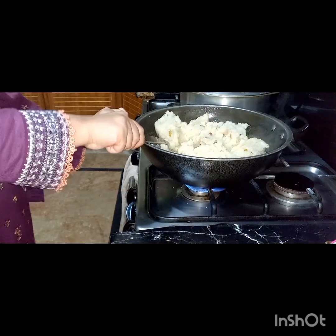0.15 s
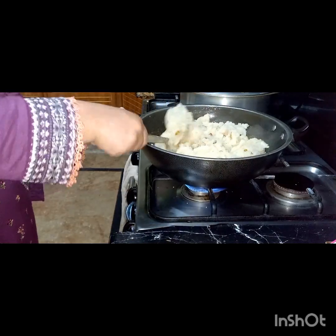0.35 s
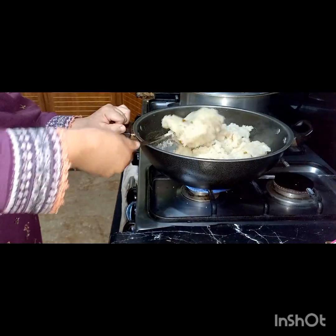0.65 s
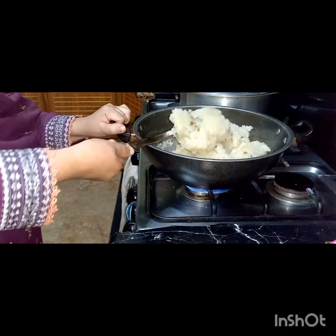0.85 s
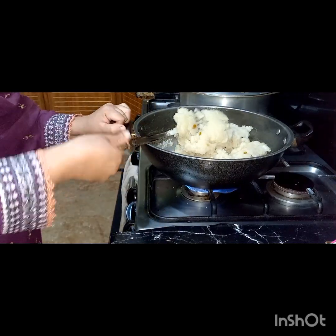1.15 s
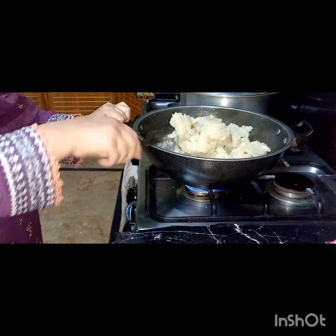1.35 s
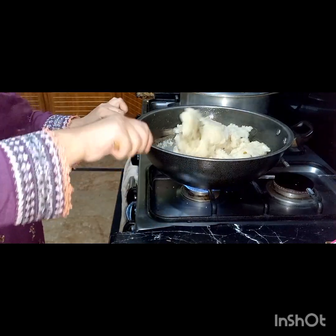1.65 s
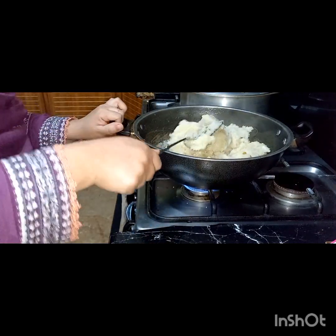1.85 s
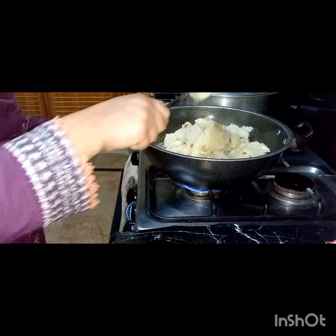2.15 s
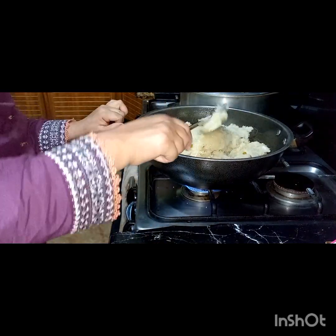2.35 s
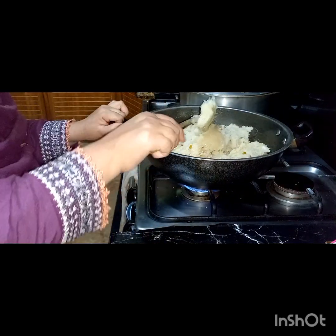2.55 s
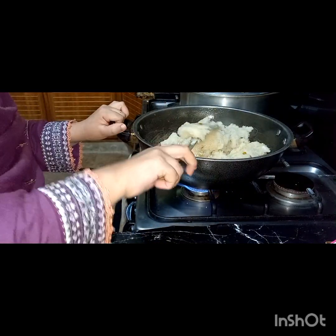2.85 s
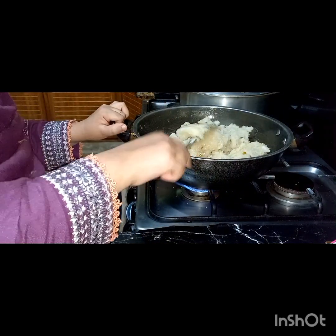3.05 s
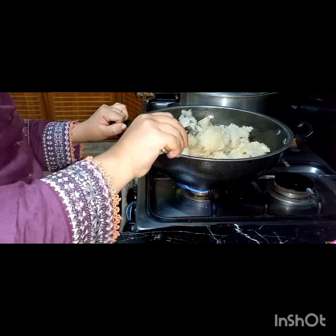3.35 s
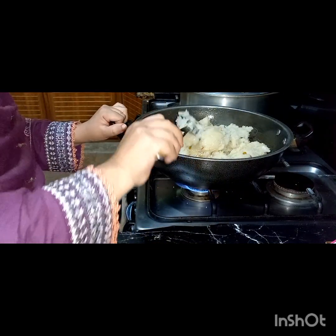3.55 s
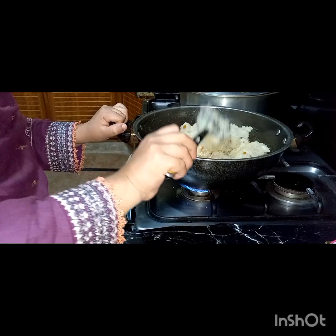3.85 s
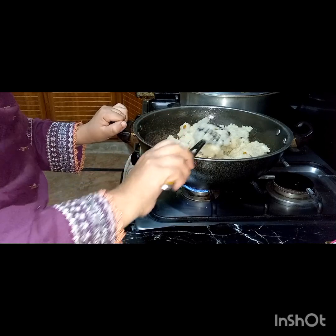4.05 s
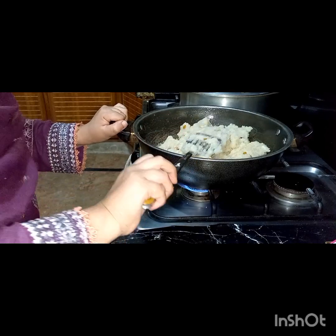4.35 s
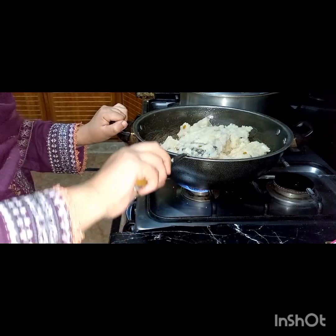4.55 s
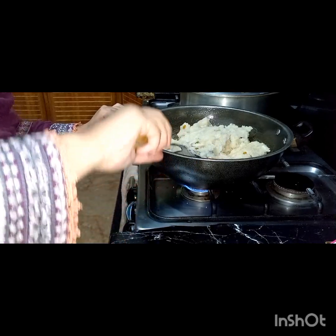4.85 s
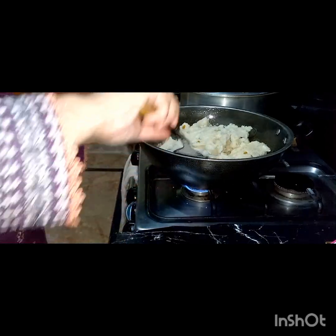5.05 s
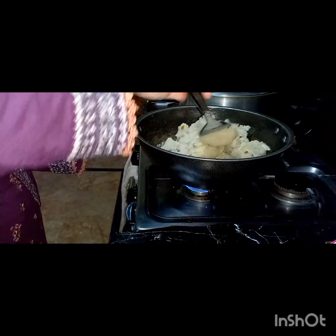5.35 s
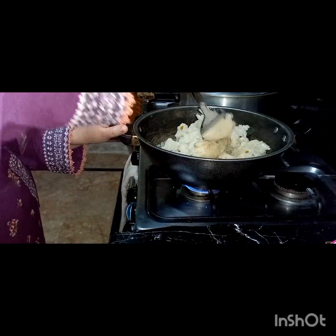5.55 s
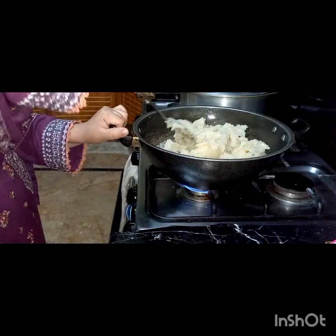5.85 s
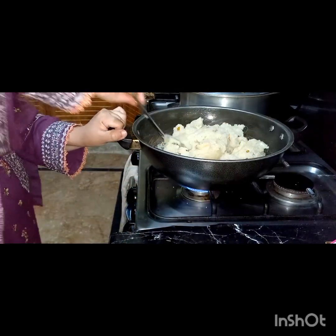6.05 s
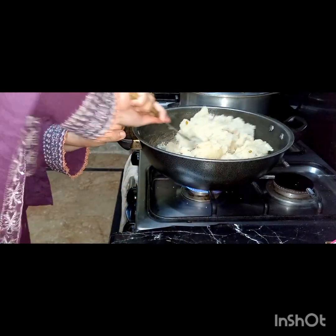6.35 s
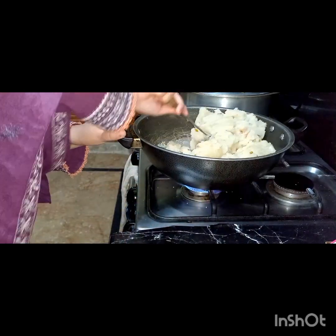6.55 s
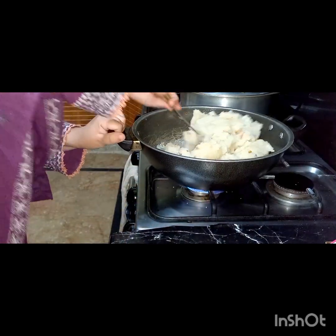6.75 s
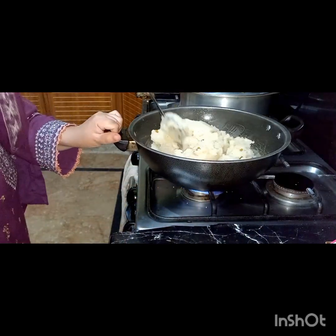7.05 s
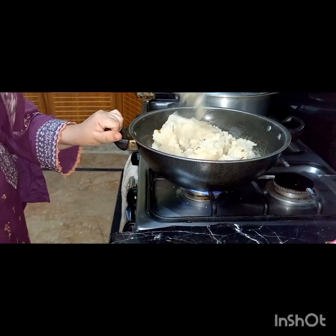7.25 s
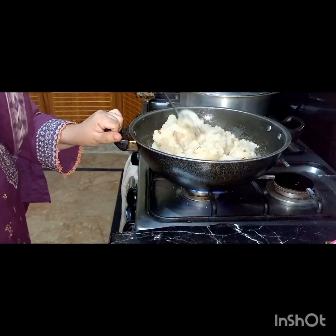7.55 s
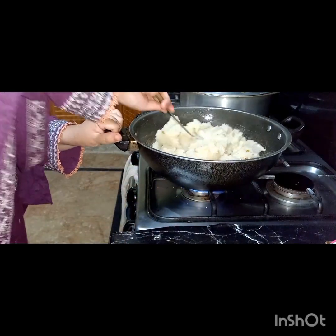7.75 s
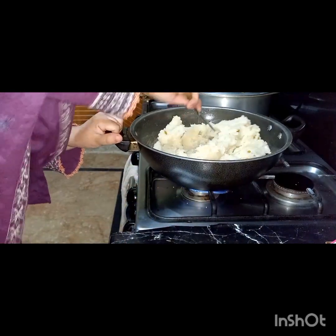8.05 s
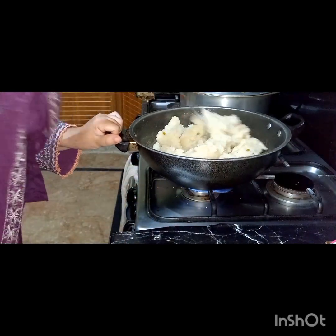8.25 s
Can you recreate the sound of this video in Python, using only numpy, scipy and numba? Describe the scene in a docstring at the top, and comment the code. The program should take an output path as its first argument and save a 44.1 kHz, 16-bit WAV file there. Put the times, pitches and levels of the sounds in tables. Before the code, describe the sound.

In a small hard-walled kitchen, a gas flame rumbles at first, then settles under light sizzling. A bright clink opens, and a paste-coated metal spoon drags softly around a wok, shoving thick paste, with occasional clinks. Later come a flurry of dull knocks and rasping scrapes, then one loud metallic bang and hard scrape near the end. Close, small microphone with lively room echo.

```python
"""A metal spoon turns thick halwa in a wok on a gas hob, in a small hard-walled kitchen.
At first the flame (shaped noise) rumbles loudly and soon settles; sizzle (tiny random clicks) calms with it.
From the start the coated spoon drags softly and shoves the paste (filtered slips); its edge clinks (modes).
Dull knocks on the wok (short pushes, ticks and modes) join in and gather into flurries.
Late on, the spoon scrapes hard in sticks and slips (a gliding rasp), and knocks the wok once loudly."""
import sys
import numpy as np
from scipy import signal
from scipy.fft import rfft, irfft
from scipy.io import wavfile
from scipy.ndimage import uniform_filter1d
from numba import njit

SR = 44100
rng = np.random.default_rng(int(sys.argv[2]) if len(sys.argv) > 2 else 0)


def wrap_up_sound(samples):
    """Save the sound to the file named by the first command line argument, as 16-bit audio."""
    columns = np.atleast_2d(samples).T
    # keep every value between -1 and 1, then stretch to whole-number steps
    tamed = np.clip(columns, -1, 1)
    steps = np.round(tamed * 32767).astype(np.int16)
    wavfile.write(sys.argv[1], SR, steps)


N = 370880
TIME = np.arange(N) / SR  # s, the whole scene
TAIL = np.arange(SR) / SR  # s, one second for impulse responses

# All spectra list: frequency_hz, density_db (power per Hz, relative).
# All mode tables list: mode_hz, t60_s, level_db (relative energy).

# Stereo width of diffuse sound: frequency_hz, side_minus_mid_db
STEREO_WIDTH = [(50, -20), (90, -16), (140, -12.5), (250, -5.5), (500, -9), (1000, 0), (2000, -0.5),
                (12000, 0.5)]

# Flame rumble as it burns loudly, then settles: time_s, rumble_db
FLAME_LEVELS = [(0.0, -43), (0.68, -53), (1.05, -61), (2.5, -63.5), (8.41, -64.5)]
# Spectrum of the flame's rumble
FLAME_SPECTRUM = [(30, -36), (48, -8), (62, -24), (82, -7), (98, 6), (118, -1.5), (145, -10.5),
                  (175, -29.5), (400, -39)]
# Spectrum of the rushing gas
GAS_SPECTRUM = [(25, -43), (48, 5), (62, -11), (100, -13), (170, -7.5), (240, 0), (310, -7), (450, -8.5),
                (550, 3.5), (720, -5), (1150, -3), (1550, -7.5), (1950, -7), (3000, -8), (4200, -22),
                (9000, -45.5)]

# Spectrum of the sizzling fat
SIZZLE_SPECTRUM = [(100, -26), (1200, -20), (2500, 0.5), (4600, 3.5), (6600, -2.5), (8300, 1.5),
                   (10000, -2.5), (12800, 0.5), (16000, -5)]
# Sizzle flares as steam escapes from lifted paste: peak_s, level_db, half_width_s (to 1/e of the power)
STEAM_PUFFS = [(0.785, -56, 0.016), (0.98, -62, 0.045), (1.325, -55.5, 0.016), (1.38, -59.5, 0.026),
               (1.736, -60, 0.1), (2.15, -60, 0.033), (2.306, -56.5, 0.0095)]
SIZZLE_FIRST_DB, SIZZLE_LAST_DB, SIZZLE_SETTLE_S = -59.5, -64.5, 3.9  # settling is a time constant

# Soft strokes of the coated spoon: start_s, length_s, rub_db, blade_db, spot_hz (pitch of the rubbed spot)
SOFT_STROKES = [(0.0, 0.8, -56.5, -62, 920), (0.6, 0.76, -56, -65, 720), (1.067, 0.032, -70, -57, 800),
                (1.31, 0.082, -55, -61.5, 760), (1.58, 0.56, -65.5, -66.5, 725),
                (2.298, 0.51, -70, -69, 560), (2.96, 0.48, -62, -61, 620), (3.443, 0.18, -62.5, -62.5, 700),
                (3.637, 0.34, -59.5, -56.5, 960), (4.236, 0.23, -58.5, -58.5, 780),
                (4.533, 0.56, -62, -61.5, 1010), (5.127, 0.056, -59.5, -54, 700),
                (5.288, 0.29, -63.5, -61.5, 580), (5.71, 0.44, -61, -61.5, 780)]
STROKE_ATTACK_S, STROKE_RELEASE_S = 0.044, 0.13  # linear rise, time constant of the fall
# Spectrum of the pan wall under rubbing
RUB_SPECTRUM = [(60, -38), (300, -3.5), (470, -6.5), (540, 7), (680, 1), (800, 6.5), (930, -4),
                (1150, -1.5), (1500, -17.5), (3000, -8.5), (6000, -22)]
# Spectrum of the spoon's resonance, damped by clinging paste
BLADE_SPECTRUM = [(100, -22), (1400, -15), (1750, -5), (1900, 5.5), (2050, -8), (2250, -3), (2600, -14.5),
                  (3100, -11.5), (4000, -19.5), (8000, -26)]

# Shoves of a lump of paste: start_s, length_s, paste_db, rumble_db (rumble of the hob)
PASTE_SHOVES = [(0.0, 0.05, -49, -71), (0.224, 0.25, -60.5, -58), (0.48, 0.19, -56.5, -53),
                (1.336, 0.044, -59, -54), (1.605, 0.22, -64.5, -81), (2.003, 0.13, -77, -66),
                (2.804, 0.045, -50, -60), (3.101, 0.21, -69, -70), (4.155, 0.066, -52, -58),
                (4.654, 0.31, -60.5, -64), (5.16, 0.24, -69, -71), (5.99, 0.13, -62, -64),
                (6.409, 0.091, -47.5, -51.5), (6.607, 0.058, -51, -49), (6.966, 0.24, -55.5, -58.5),
                (8.143, 0.12, -67, -60), (8.302, 0.11, -47, -50.5)]
SHOVE_ATTACK_S, SHOVE_RELEASE_S = 0.069, 0.066  # linear rise, time constant of the fall
# Spectrum of tearing paste, also of the pan's judder
PASTE_SPECTRUM = [(25, -52), (55, -22), (90, -8), (130, -16.5), (170, -13.5), (245, 2), (315, -7.5),
                  (390, -4.5), (600, -22), (1500, -41)]
# Spectrum of the hob's top booming under the wok
BOOM_SPECTRUM = [(40, -33.5), (70, -1.5), (100, 7.5), (135, -2.5), (180, -12), (260, -20), (500, -35)]

# Bright clinks of the spoon: start_s, tick_db, tick_t60_s, tick_low_edge_hz, ring_hz, ring_db,
# wok_hz, wok_db, room_db (echoes of the tick)
SPOON_CLINKS = [(0.002, -8, 0.16, 600, 5600, -14, 400, -15, 0.5),
                (2.8335, -4.5, 0.036, 500, 3320, -9.5, 566, -8, 0),
                (4.1577, -3, 0.026, 1200, 4930, -7.5, 750, -8.5, 1),
                (5.5630, -15, 0.019, 8500, 8700, -38, 600, -36, -9),
                (6.685, -26, 0.018, 5000, 5500, -37, 600, -38, -9)]
# Spectrum of the spoon's bare edge chattering on the rim
CHATTER_SPECTRUM = [(400, -12), (1200, -4.5), (2000, 1.5), (3600, -3), (5500, -1), (8200, 1), (11000, -2),
                    (13500, -7.5), (16000, -9)]
# Modes of the bare spoon bowl
SPOON_MODES = [(3117, 0.025, -5), (3240, 0.02, -1), (4720, 0.015, 5), (4830, 0.012, 4.5), (5000, 0.013, 2),
               (6000, 0.0045, -4), (7500, 0.005, -5), (8500, 0.007, -1)]
# Modes of the loaded wok
WOK_MODES = [(99.2, 0.78, -8), (210.6, 0.67, 3), (253, 1, -8), (268.2, 0.22, 4.5), (326, 0.5, -8),
             (384, 0.2, -3), (418, 0.29, -6.5), (447, 0.33, 2), (486, 0.33, -3), (541.3, 0.15, 11),
             (578.6, 0.18, -0.5), (623, 0.092, -0.5), (713, 0.093, 2), (799, 0.1, 4.5), (938, 0.074, -0.5),
             (1032, 0.058, -5.5), (1130, 0.072, 2.5), (1330, 0.12, 1.5), (1786, 0.091, -7),
             (1997, 0.064, 4.5)]

# Dull knocks on the wok: start_s, blow_hz, blow_db, tick_db, wok_db, room_db
WOK_KNOCKS = [(2.3598, 1100, -36, -27.5, -28.5, 1), (2.847, 238, -21, -45, -19, 0),
              (3.6828, 785, -42, -36, -33, 2), (6.1312, 617, -18, -26.5, -11.5, 5),
              (6.187, 1510, -17.5, -27, -17, 4), (6.213, 790, -13.5, -33, -24, -3),
              (6.2695, 780, -15, -35, -14, 3.5), (6.315, 645, -15, -24, -16, 4),
              (6.339, 560, -17, -23, -14, 2), (6.3594, 615, -19.5, -18.5, -15, 4.5),
              (6.455, 400, -19, -38, -19, -2), (6.6362, 1450, -20, -19.5, -21, 1),
              (6.6399, 890, -15, -21.5, -24, 0), (6.651, 267, -16.5, -45, -23, -1),
              (7.175, 400, -26, -45, -31, -1), (7.2165, 900, -31, -35, -25, -1),
              (7.2758, 1100, -21, -29, -34, -1), (7.385, 1100, -27, -34, -31, 6),
              (7.440, 1070, -29, -29, -16, 5), (7.587, 1080, -17, -27, -30, 3),
              (7.630, 1390, -25, -27, -34, 12), (7.7253, 815, 2.5, -0.5, 2, -3.5),
              (7.729, 760, 5.5, -4, -5.5, -4.5), (7.736, 460, -7, -30, -6, -8)]
# Spectrum of the tick in a knock
TICK_SPECTRUM = [(300, -79), (1200, 2), (2400, 3.5), (3600, -4), (4600, -1.5), (6600, -9), (8500, -5.5),
                 (10000, -13), (13000, -12), (16000, -20)]

# Hard scrapes; the rasp glides as the spoon travels over the curved wall: start_s, length_s, rasp_db,
# swell_db_per_s, first_hz, last_hz, judder_db, grit_db
HARD_SCRAPES = [(6.137, 0.24, -48, 35, 694, 600, -56, -68), (6.17, 0.16, -56, -2, 1400, 1000, -48.5, -74),
                (6.359, 0.17, -41.5, -67, 720, 446, -47.5, -50.5),
                (6.706, 0.13, -62, -23, 806, 704, -69, -65), (6.834, 0.13, -60, 1, 920, 925, -61, -68),
                (6.874, 0.025, -58, 0, 2900, 3200, -72, -58.5), (6.968, 0.15, -56, 8, 427, 585, -63, -84),
                (7.122, 0.577, -54, 11.5, 880, 1150, -72, -74),
                (7.733, 0.15, -34.5, -66, 490, 435, -42.5, -46),
                (7.854, 0.11, -46, -77, 467, 482, -41.5, -49),
                (7.948, 0.39, -57, 5.5, 1770, 1700, -65, -74), (8.332, 0.053, -54, 0, 900, 850, -58, -68)]
SCRAPE_ATTACK_S, SCRAPE_RELEASE_S = 0.028, 0.021  # linear rise, time constant of the fall
# The edge hiss sits 72 % of the way from rasp level to grit level, then EDGE_DB lower
EDGE_DB, EDGE_GRIT_SHARE = -8, 0.72
# Spectrum of the scraped pan wall
SCRAPE_SPECTRUM = [(40, -33), (200, -10), (380, -6), (470, 1.5), (570, 8.5), (850, 1.5), (1300, -1.5),
                   (1900, -1.5), (2600, -8.5), (4000, -23), (8000, -34)]
# Spectrum of the spoon's bare edge hissing on the pan
EDGE_SPECTRUM = [(200, -37), (1400, 2), (2000, -5), (3200, 1), (3800, -1), (5000, -12), (8000, -31)]
# Spectrum of crackling crust
GRIT_SPECTRUM = [(100, -56), (1200, 7.5), (3000, 0), (4500, 7), (6500, -1), (8300, 1), (9800, -4.5),
                 (13000, 0), (16000, -13)]

TOP_HZ = 15900  # top of the recorder's band


def amp(db):
    """Decibels to gain."""
    return 10 ** (np.asarray(db) / 20)


def fade(t60):
    """An exponential decay that drops 60 dB in t60 seconds, one second long."""
    return np.exp(-np.log(1000) * TAIL / t60)


def unit(x):
    """Scale a response to unit energy per channel."""
    return x / np.sqrt(np.mean(np.sum(x ** 2, axis=-1)))


def through(x, response):
    """Pass a sound through an impulse response."""
    return signal.oaconvolve(np.atleast_2d(x), np.atleast_2d(response), axes=-1)[:, :x.shape[-1]]


def colour(x, spectrum, size=4096):
    """Shape a sound with a causal minimum-phase filter of the given spectrum."""
    hz, db = np.transpose(spectrum)
    grid = np.maximum(np.fft.rfftfreq(size, 1 / SR), 1)
    curve_db = np.interp(np.log(grid), np.log(hz), db)
    cepstrum = irfft(np.log(amp(curve_db)))
    # folding the cepstrum forward makes the filter causal
    cepstrum[1:size // 2] *= 2
    cepstrum[size // 2 + 1:] = 0
    return through(x, irfft(np.exp(rfft(cepstrum))))


def level(x, band):
    """Scale a sound so that its middle has rms 1 within a band in Hz."""
    band_pass = signal.butter(2, band, "band", fs=SR, output="sos")
    middle = signal.sosfilt(band_pass, x.mean(axis=0))
    return x / middle.std()


def walk(rate):
    """Slow chance: random levels, rate per second, smoothed twice to spread 1."""
    k = int(SR / rate)
    steps = np.repeat(rng.standard_normal(N // k + 1), k)[:N]
    smooth = uniform_filter1d(uniform_filter1d(steps, k), k)
    return smooth / smooth.std()


def waver(rate, depth_db):
    """A gain that wanders at random."""
    return amp(depth_db * walk(rate))


def pan(right_db):
    """Lift the right and cut the left by the same decibels."""
    return amp([[-right_db], [right_db]])


def diffuse(size):
    """Noise from all around: alike in both ears in the bass, unrelated in the treble."""
    mid, side = rng.standard_normal((2, size))
    return mid + colour(side, STEREO_WIDTH) * np.array([[1], [-1]])


def slips(rate, spread_db, patchy_db):
    """Tiny random clicks, rate per second, of uneven size and with wandering loudness."""
    happens = rng.random(N) < rate / SR
    size = np.minimum(rng.exponential(size=N), 5)
    sign = rng.choice([-1, 1], N)
    return happens * sign * amp(spread_db * size + patchy_db * walk(35))


def scattered(clicks, wet_db, t60=0.11):
    """Clicks from ever-changing places: each trails its own diffuse echo, so no echo pattern repeats."""
    energy = np.abs(through(clicks ** 2, unit(fade(t60)) ** 2))
    return clicks + amp(wet_db) * np.sqrt(energy) * diffuse(N)


@njit
def sweep(x, hz, q):
    """State-variable band-pass whose centre moves."""
    y = np.empty_like(x)
    for c in range(len(x)):
        band, low = 0., 0.
        for i in range(len(hz)):
            g = np.tan(np.pi * hz[i] / SR)
            v = (band + g * (x[c, i] - low)) / (1 + g * (g + 1 / q))
            band, low, y[c, i] = 2 * v - band, low + 2 * g * v, v / q
    return y


def gesture(start, length, attack_s, release_s):
    """One move of the hand: the pressure builds, holds and dies away."""
    age = TIME - start
    rise = np.clip(age / attack_s, 0, 1)
    return rise * np.exp(-np.clip((age - length) / release_s, 0, 20))


def together(envelopes, dbs):
    """Gain of overlapping gestures, each at its own level; their powers add."""
    return np.sqrt(amp(dbs) ** 2 @ np.square(envelopes))


def ring(modes):
    """Impulse response of decaying modes that start from rest; neighbours swing opposite ways."""
    total = 0
    for k, (hz, t60, db) in enumerate(modes):
        mode = unit(fade(t60) * np.sin(2 * np.pi * hz * TAIL))
        total = total + (-1) ** k * amp(db) * mode
    return unit(total)


def wok_response():
    """The wok's wide wall sends each of its modes a little differently to each ear."""
    modes = ring(WOK_MODES)
    side = unit(through(modes, rng.standard_normal(SR) * fade(0.013)))
    return unit(modes + amp(-2.0) * side * np.array([[1], [-1]]))


def struck(wok, hz, q=1.0):
    """The wok's ring after a blow: the modes near the blow's own pitch answer most."""
    return unit(signal.lfilter(*signal.iirpeak(hz, q, fs=SR), wok))


def boom(t60=1.0, build_s=0.028):
    """A blow reaches the hob through the grate; its low boom comes late and stays."""
    swelling = fade(t60) * (1 - np.exp(-TAIL / build_s))
    return unit(colour(diffuse(SR) * swelling, BOOM_SPECTRUM))


def kitchen(low_t60=0.81, high_t60=0.41, early_t60=0.26, early_db=-4, build_s=0.0094):
    """Early echoes from hob and wall, and a tail in which the lows come late and stay."""
    low = signal.sosfilt(signal.butter(2, 700, fs=SR, output="sos"), diffuse(SR))
    high = signal.sosfilt(signal.butter(2, 700, "high", fs=SR, output="sos"), diffuse(SR))
    tail = low * fade(low_t60) * (1 - np.exp(-TAIL / build_s)) + high * fade(high_t60)
    early = unit(diffuse(SR) * fade(early_t60))
    after_gap = TAIL > .002  # s before the first echo
    return unit((unit(tail) + amp(early_db) * early) * after_gap)


def heard(x, room, wet_db):
    """Direct sound plus the kitchen's answer."""
    return x + amp(wet_db) * through(x, room)


def add(out, s, sound):
    """Mix a sound in at a time."""
    start = max(int(s * SR), 0)
    out[:, start:start + sound.shape[-1]] += sound[:, :N - start]


def hob(gas_db=-57.0):
    """The flame rumbles unevenly under the wok and the gas rushes steadily."""
    time_s, rumble_db = np.transpose(FLAME_LEVELS)
    flame_gain = amp(np.interp(TIME, time_s, rumble_db))
    flame = level(colour(diffuse(N), FLAME_SPECTRUM), (70, 140))
    gas = level(colour(diffuse(N), GAS_SPECTRUM), (200, 3000))
    flame = flame * flame_gain * waver(rate=7.2, depth_db=1.0) * pan(right_db=2.0)
    return flame + gas * amp(gas_db)


def sizzle():
    """Fat fizzes in countless tiny bursts, slowly calms, and flares where steam escapes."""
    calming = np.exp(-TIME / SIZZLE_SETTLE_S)
    steady = amp(SIZZLE_LAST_DB + (SIZZLE_FIRST_DB - SIZZLE_LAST_DB) * calming)
    flare_power = sum(amp(db) ** 2 * np.exp(-((TIME - s) / width) ** 2) for s, db, width in STEAM_PUFFS)
    bursts = slips(rate=9000, spread_db=2.5, patchy_db=.3)
    fizz = level(colour(scattered(bursts, wet_db=11.0), SIZZLE_SPECTRUM), (4000, 15000))
    return fizz * np.sqrt(steady ** 2 + flare_power) * pan(right_db=1.1)


def stirring(spot_db=-7):
    """The coated spoon rubs the pan, each spot with its own pitch, and hums in its own damped resonance."""
    _, _, rub_db, blade_db, spot_hz = np.transpose(SOFT_STROKES)
    strokes = [gesture(s, length, STROKE_ATTACK_S, STROKE_RELEASE_S) for s, length, *_ in SOFT_STROKES]
    # overlapping strokes share one pitch, weighted by their power
    power = np.square(strokes) + np.finfo(float).eps
    centre_hz = spot_hz @ power / power.sum(axis=0)
    catches = slips(rate=2500, spread_db=2.5, patchy_db=.9)
    # the hand's pressure wavers
    contact = scattered(catches, wet_db=2.0, t60=0.031) * waver(rate=5.4, depth_db=1.5)
    wall = colour(contact, RUB_SPECTRUM)
    spot = sweep(wall, centre_hz, q=2.8)
    rub = level(unit(wall) + amp(spot_db) * unit(spot), (480, 1300))
    blade = level(colour(contact, BLADE_SPECTRUM), (1700, 2400))
    return rub * together(strokes, rub_db) + blade * together(strokes, blade_db)


def shoving():
    """Thick paste tears and flops as it is shoved, and the push rumbles in the hob."""
    _, _, paste_db, rumble_db = np.transpose(PASTE_SHOVES)
    shoves = [gesture(s, length, SHOVE_ATTACK_S, SHOVE_RELEASE_S) for s, length, *_ in PASTE_SHOVES]
    tears = scattered(slips(rate=660, spread_db=3.5, patchy_db=1.5), wet_db=-3.0)
    paste = level(colour(tears, PASTE_SPECTRUM), (170, 420))
    rumble = level(colour(diffuse(N), BOOM_SPECTRUM), (70, 140))
    return paste * together(shoves, paste_db) + rumble * together(shoves, rumble_db)


def chatter(t60, wet_db, room_t60=0.41):
    """A dense burst of tiny metal contacts; its echoes merge into one smooth tail."""
    burst = unit(fade(t60)) ** 2  # power envelope
    echoes = np.abs(through(burst, unit(fade(room_t60)) ** 2))
    envelope = np.sqrt(burst + amp(wet_db) ** 2 * echoes)
    return unit(colour(diffuse(SR) * envelope, CHATTER_SPECTRUM))


def clinks(room, wok, boom_db=-8, wok_wet_db=-2, ring_wet_db=-3):
    """The spoon's edge strikes the pan; where it is struck decides which of its modes sing loudest."""
    out = np.zeros((2, N))
    for s, tick_db, tick_t60, low_edge_hz, ring_hz, ring_db, wok_hz, wok_db, room_db in SPOON_CLINKS:
        # each tick keeps only what lies above its own low edge
        low_cut = signal.butter(2, low_edge_hz, "high", fs=SR, output="sos")
        edge = signal.sosfilt(low_cut, chatter(tick_t60, room_db)) * pan(right_db=0.5)
        # modes lose 17 dB per octave away from the favoured pitch
        modes = [(hz, t60, db - 17 * abs(np.log2(hz / ring_hz))) for hz, t60, db in SPOON_MODES]
        # the chatter itself sets the spoon ringing
        spoon = unit(through(chatter(tick_t60, ring_wet_db), ring(modes)))
        body = heard(struck(wok, wok_hz, q=2.2), room, wok_wet_db) + amp(boom_db) * boom()
        add(out, s, amp(tick_db) * edge + amp(ring_db) * spoon + amp(wok_db) * body)
    return out


def push(hz, rise_cycles):
    """The pan wall swings out and back about twice before the paste stops it."""
    cycles = hz * TAIL
    envelope = cycles * np.exp(-np.minimum(cycles / rise_cycles, 40))
    return unit(np.sin(2 * np.pi * cycles) * envelope)


def tick(t60, right_db):
    """Metal chatters briefly on metal, a little to the right."""
    return unit(colour(diffuse(SR) * fade(t60), TICK_SPECTRUM)) * pan(right_db)


def knocks(room, wok, boom_db=-11):
    """Paste-cushioned blows: one short push of the pan wall, a tick and the wok's ring, each blow at its pitch."""
    out = np.zeros((2, N))
    hob_boom = boom()
    for s, blow_hz, blow_db, tick_db, wok_db, room_db in WOK_KNOCKS:
        blow = amp(blow_db) * push(blow_hz, rise_cycles=0.44)
        metal = amp(tick_db) * tick(t60=0.038, right_db=1.0)
        body = amp(wok_db) * struck(wok, blow_hz)
        sound = heard(blow + metal + body, room, room_db)
        add(out, s, sound + amp(wok_db + boom_db) * hob_boom)
    return out


def scrape_motion():
    """Each scrape swells or eases steadily and glides in pitch; the stronger pulls the rasp's centre more."""
    envelopes, weight, centre = [], 0, 0
    for s, length, _, swell_db_per_s, first_hz, last_hz, *_ in HARD_SCRAPES:
        age = np.clip(TIME - s, 0, length)
        pressure = gesture(s, length, SCRAPE_ATTACK_S, SCRAPE_RELEASE_S)
        envelope = pressure * amp(swell_db_per_s * age)
        power = envelope ** 2 + np.finfo(float).eps
        glide_hz = first_hz + (last_hz - first_hz) * age / length
        weight, centre = weight + power, centre + power * glide_hz
        envelopes.append(envelope)
    return envelopes, centre / weight


def scraping(wok):
    """Pressed on bare metal the spoon sticks and slips: the wall rasps, pan judders, edge hisses, crust crackles."""
    _, _, rasp_db, _, _, _, judder_db, grit_db = np.transpose(HARD_SCRAPES)
    edge_db = EDGE_DB + rasp_db + EDGE_GRIT_SHARE * (grit_db - rasp_db)
    scrapes, centre_hz = scrape_motion()

    contact = scattered(slips(rate=800, spread_db=2.3, patchy_db=.5), wet_db=1.5, t60=0.033)
    crumbs = scattered(slips(rate=4000, spread_db=3.5, patchy_db=.8), wet_db=7)
    jerks = scattered(slips(rate=1200, spread_db=4.0, patchy_db=0.5), wet_db=-3.5)

    wall = colour(contact, SCRAPE_SPECTRUM)
    # two passes sharpen the gliding band; the root evens out its growing width
    spot = sweep(sweep(contact, centre_hz, q=2.2), centre_hz, q=2.2) / np.sqrt(centre_hz)
    rasp = unit(spot) + amp(3.0) * unit(wall) + amp(-4.5) * unit(through(contact, wok))

    rasp = level(rasp, (480, 2200))
    judder = level(colour(jerks, PASTE_SPECTRUM), (170, 420))
    edge = level(colour(crumbs, EDGE_SPECTRUM), (2300, 3800))
    grit = level(colour(crumbs, GRIT_SPECTRUM), (5000, 14000))
    layers = (rasp, rasp_db), (judder, judder_db), (edge, edge_db), (grit, grit_db)
    return sum(sound * together(scrapes, dbs) for sound, dbs in layers)


def scene():
    """Flame, sizzle and every move of the spoon; clinks and knocks share one room response and one wok."""
    room, wok = kitchen(), wok_response()
    background = hob() + sizzle()
    soft_moves = stirring() + shoving()
    hard_contacts = clinks(room, wok) + knocks(room, wok) + scraping(wok)
    return background + soft_moves + hard_contacts


def record(dry):
    """The small microphone loses the deepest bass; the recorder cuts the top steeply."""
    thin = signal.sosfilt(signal.butter(4, 42, "high", fs=SR, output="sos"), dry)
    return signal.sosfilt(signal.ellip(10, .2, 70, TOP_HZ, fs=SR, output="sos"), thin)


dry = scene()
out = record(dry)
wrap_up_sound(out)
```